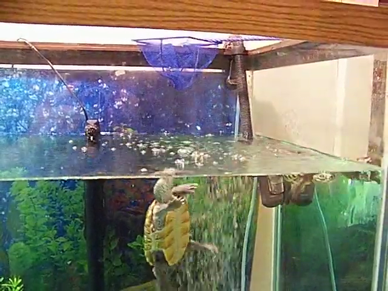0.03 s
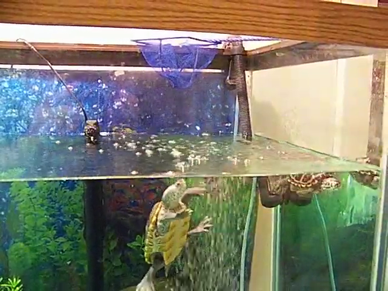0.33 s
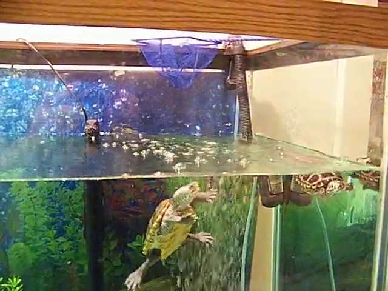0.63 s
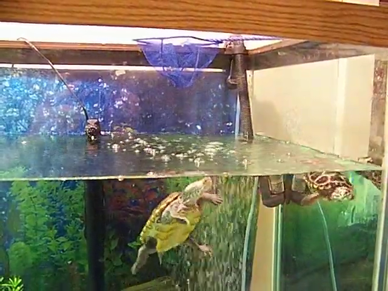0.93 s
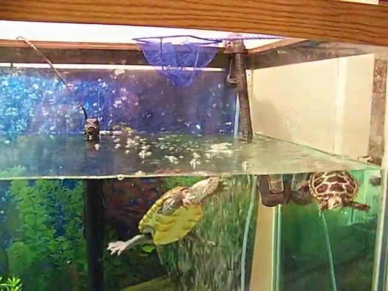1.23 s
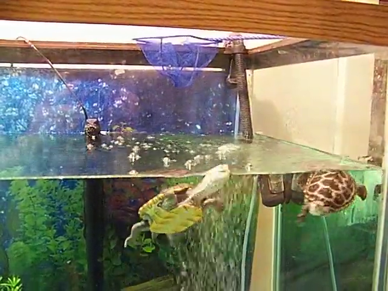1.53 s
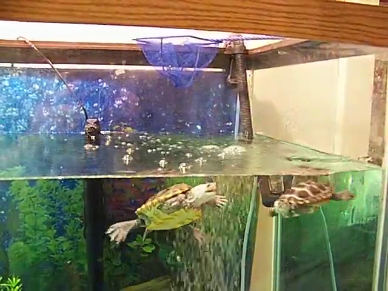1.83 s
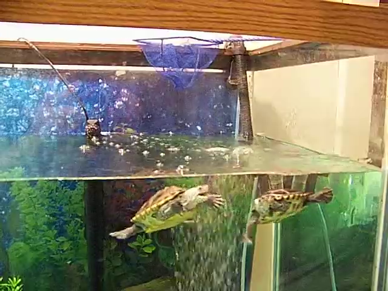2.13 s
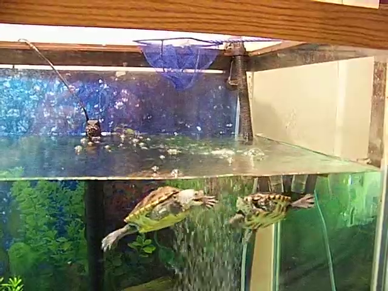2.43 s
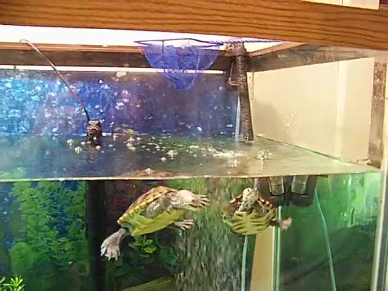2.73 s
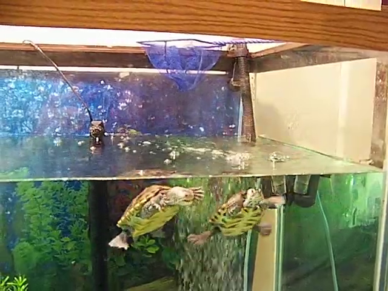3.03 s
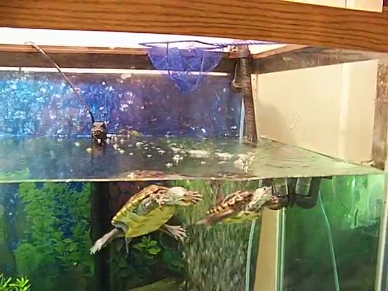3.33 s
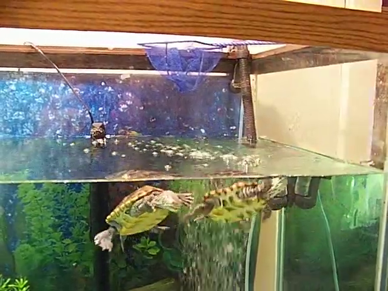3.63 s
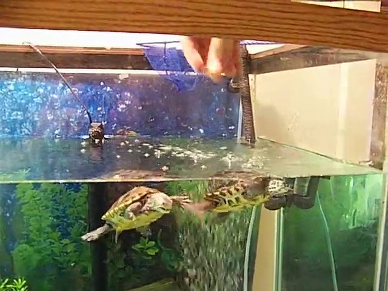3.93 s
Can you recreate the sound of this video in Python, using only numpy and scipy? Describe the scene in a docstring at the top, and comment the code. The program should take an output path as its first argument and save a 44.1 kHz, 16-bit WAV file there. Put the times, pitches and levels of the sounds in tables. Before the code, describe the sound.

Light water splashes and patters as turtles swim, with an aquarium filter trickling and humming underneath.

```python
"""A glass tank, up close: turtles paddle after floating food pellets.
Their feet throw fizzing splashes, droplets tick and smack on the surface, a few bubbles plop and water
laps over the shells; the glass and the room throw it all back. Underneath, the filter hisses, trickles
and bubbles, and two pump motors hum and beat against each other."""
import sys
import numpy as np
from scipy import signal
from scipy.fft import rfft, irfft, next_fast_len
from scipy.io import wavfile

SR = 44100
rng = np.random.default_rng(int(sys.argv[2]) if len(sys.argv) > 2 else 0)


def wav_out(sig):
    """Save sig, one row per channel (or a flat mono array), as 16-bit PCM at SR to the path in sys.argv[1]."""
    wavfile.write(sys.argv[1], SR, np.round(np.clip(np.atleast_2d(sig).T, -1, 1) * 32767).astype(np.int16))


N = 176400
T = np.arange(N) / SR

# level ride of the filter's water flow: time_s, level_db
FLOW_RIDE = [(0, -54), (.85, -53), (1.1, -50.5), (2.6, -50.5), (4, -50.5)]


def amp(db):
    """Decibels to gain."""
    return 10 ** (np.asarray(db) / 20)


def unit(x):
    """Scales to rms 1."""
    return x / np.sqrt(np.mean(x ** 2) + 1e-20)


def add(mix, start_s, sound):
    """Mixes a sound in at its start time."""
    part = mix[max(round(start_s * SR), 0):][:len(sound)]
    part += sound[:len(part)]


def fader(ride):
    """Gain over the whole scene from (time_s, level_db) points."""
    return amp(np.interp(T, *np.transpose(ride)))


def colour(x, eq):
    """Applies an EQ curve drawn on a log-frequency axis."""
    size = next_fast_len(2 * len(x))
    hz, db = np.transpose(eq)
    gain = amp(np.interp(np.log(np.fft.rfftfreq(size, 1 / SR) + 1), np.log(hz), db))
    return irfft(rfft(x, size) * gain, size)[:len(x)]


def pops(per_s, spread_db):
    """A random train of tiny bursts, a few much larger than the rest."""
    clicks = (rng.random(N) < per_s / SR) * rng.choice([-1., 1.], N)
    return clicks * amp(spread_db * np.minimum(rng.exponential(1, N), 4))


def filter_flow():
    """The filter's trickling wash, its fizzing air bubbles and the resonances that they stir."""
    # tone of the wash: freq_hz, gain_db
    wash_eq = [(15, 7.5), (30, 4), (70, 1.5), (140, -7), (290, -5), (450, -9.5), (700, -5), (830, -8),
               (1000, -4.5), (1280, -7), (1600, -10), (2200, -9.5), (2900, -11.5), (3300, -18.5),
               (4050, -35.5), (9000, -64)]
    # tone of the air bubbles: freq_hz, gain_db
    fizz_eq = [(1000, -29.5), (4250, -27), (5100, -12.5), (6300, -5), (7400, -0.5), (8000, -3),
               (8600, -18.5), (9200, -48.5)]
    # level ride of the fizz: time_s, level_db
    fizz_ride = [(0, -55), (.85, -56), (1.1, -54), (2.6, -54), (4, -53.5)]
    # tank and hood resonances: pitch_hz, width_hz, level_db
    resonances = [(101.6, 2.4, -62), (230.5, 6.9, -62.5), (308, 11, -69), (374.4, 11, -71.5),
                  (687.5, 14, -71), (978, 13, -66.5), (1138, 10, -71), (1260, 12, -72)]
    trickle = unit(pops(per_s=1200, spread_db=5))
    wash = unit(colour(0.5 * trickle + rng.standard_normal(N), wash_eq))
    fizz = unit(colour(pops(per_s=9000, spread_db=3.5), fizz_eq))
    out = wash * fader(FLOW_RIDE) + fizz * fader(fizz_ride)
    freq_hz = np.fft.rfftfreq(N, 1 / SR)
    for pitch_hz, width_hz, level_db in resonances:
        peak = 1 / (1 + ((freq_hz - pitch_hz) / width_hz) ** 2)
        out += amp(level_db) * unit(irfft(rfft(rng.standard_normal(N)) * peak, N))
    return out


def outlet_bubbles():
    """Small bubbles ring at random where the filter returns its water, riding with the flow."""
    # bubble sizes: pitch_hz, average_db
    sizes = [(900, -64), (1050, -62), (1250, -63.5), (1550, -66.5), (2000, -67), (2400, -68.5), (2850, -66)]
    out, t = np.zeros(N), T[:SR // 16]
    attack_s, decay_s, pitch_spread = 0.002, 0.012, 0.0827
    envelope = np.minimum(t / attack_s, 1) * np.exp(-t / decay_s)
    for pitch_hz, average_db in sizes:
        group = np.zeros(N)
        for detune in pitch_spread * rng.uniform(-0.994, 1, size=4):
            ring = envelope * np.sin(2 * np.pi * pitch_hz * (1 + detune) * t)
            group += signal.oaconvolve(pops(per_s=12, spread_db=1.5), ring)[:N]
        out += amp(average_db) * unit(group)
    return out * unit(fader(FLOW_RIDE))


def ticking():
    """Very faint ticks in the hiss, uneven in time and strength."""
    # tone of a tick: freq_hz, gain_db
    tick_eq = [(300, -3.5), (3000, 4.5), (5500, -5), (9000, -20)]
    gap_s, jitter_s, click_db, spread_db = 0.016, 0.0012, -39, 4
    clicks = np.zeros(N)
    for k, (late, strength) in enumerate(rng.standard_normal(size=(280, 2))):
        add(clicks, k * gap_s + jitter_s * late, amp([click_db + spread_db * strength]))
    return colour(clicks, tick_eq)


def pumps():
    """Two motors, slightly apart in speed: their hum swells and sags once a second."""
    mains_hz, beat_hz, crest_s = 60, 1.0, 1.51
    t = T - crest_s
    first = amp(-44) * np.cos(2 * np.pi * mains_hz * t)
    second = amp(-48) * np.cos(2 * np.pi * (mains_hz + beat_hz) * t)
    return first + second


def splashes():
    """Each paddle stroke throws a quick shower of fine spray and a cluster of larger, ringing bubbles."""
    # strokes of the feet: start_s, length_s, spray_db, bubbles_vs_spray_db, bubble_pitch_hz
    strokes = [(0, .022, -31.5, -5, 2240), (0.048, 0.018, -35.5, -9.5, 2180),
               (0.071, 0.018, -41.5, -20, 2400), (0.106, 0.046, -37, -14, 2220),
               (0.155, 0.068, -48.5, -7.5, 2200), (.99, 0.19, -55.5, -8.5, 2530),
               (1.222, 0.032, -46, -5, 2820), (1.299, .01, -43.5, -17, 2600),
               (1.542, 0.044, -43.5, -6, 2400), (1.658, 0.015, -39, -10.5, 2450),
               (1.69, 0.059, -46, -8.5, 2510), (1.743, 0.061, -39.5, -9.5, 2410),
               (1.824, 0.062, -39.5, -9, 2380), (1.899, 0.019, -36, -11, 2460),
               (1.962, 0.0064, -38, -8.5, 2480), (1.987, 0.038, -49, -7, 2370),
               (2.118, 0.045, -46.5, -10.5, 2400), (2.183, 0.035, -47.5, -7.5, 2340),
               (2.361, 0.091, -53.5, -7, 2420), (2.515, 0.0059, -40.5, -21, 2380),
               (2.537, .004, -39.5, -10, 2720), (2.774, 0.011, -39.5, -14, 2460),
               (3.639, 0.0085, -51, 3, 2870)]
    # tone of the fine spray: freq_hz, gain_db
    spray_eq = [(300, -40), (1800, -35), (3300, -25.5), (4200, -27), (5200, -10.5), (6300, -3), (7200, 2),
                (8000, -3), (8600, -18.5), (9200, -36)]
    # tone of the churned water: freq_hz, gain_db
    gurgle_eq = [(300, -4.5), (1700, -13.5), (2300, -1.5), (2850, -0.5), (3400, -0.5), (4100, -20),
                 (6000, -14.5)]
    attack_s, release_s, ring_width_hz, ring_db = 0.0015, 0.011, 210, -2.5
    out, t = np.zeros(N), T[:SR // 3]
    spray = unit(colour(pops(per_s=2200, spread_db=3), spray_eq))
    churn = pops(per_s=2000, spread_db=2.5)
    gurgle = unit(colour(churn, gurgle_eq))
    for start_s, length_s, spray_db, bubbles_vs_spray_db, pitch_hz in strokes:
        span = (round(start_s * SR) + np.arange(len(t))) % N
        envelope = np.minimum(t / attack_s, 1) * np.exp(-np.maximum(t - length_s, 0) / release_s)
        resonator = signal.iirpeak(pitch_hz, pitch_hz / ring_width_hz, SR)
        ring = unit(signal.lfilter(*resonator, churn[span]))
        bubbles = amp(bubbles_vs_spray_db) * unit(gurgle[span] + amp(ring_db) * ring)
        add(out, start_s, amp(spray_db) * envelope * (spray[span] + bubbles))
    return out


def plops():
    """Larger bubbles ring briefly, rising in pitch."""
    # single bubbles: start_s, pitch_hz, level_db, decay_s
    bubbles = [(.007, 2140, -46.5, 0.021), (2.6726, 2390, -29, 0.0022), (3.641, 3040, -44, 0.0027),
               (3.809, 2180, -36.5, 0.0048)]
    attack_s, rise_per_s = 0.00022, 15  # the rise is in multiples of the starting pitch
    out, t = np.zeros(N), T[:SR // 20]
    for start_s, pitch_hz, level_db, decay_s in bubbles:
        ring = np.sin(2 * np.pi * pitch_hz * (t + 0.5 * rise_per_s * t ** 2))
        envelope = np.minimum(t / attack_s, 1) * np.exp(-t / decay_s)
        add(out, start_s, amp(level_db) * envelope * ring)
    return out


def droplets():
    """Each droplet is a few cycles of a tiny bubble with a faint snap, echoed by the glass wall."""
    # droplets landing: time_s, level_db, pitch_hz, echo_gain (0-1)
    landings = [(0.0186, -18, 7200, .2), (0.019, -36, 7200, .3), (.0237, -37, 7000, .1),
                (0.0338, -15.5, 7330, .1), (.0586, -20.5, 7530, .7), (.1, -25, 7400, .1),
                (.1076, -17.5, 7170, .1), (.1087, -18.5, 7200, .1), (0.1342, -20, 7360, .1),
                (.1411, -14, 7200, .1), (0.145, -15, 7160, .1), (.1462, -19, 7230, .1),
                (.1491, -19, 7200, .1), (.1728, -23, 7200, .1), (.193, -25, 6940, .1),
                (0.2078, -26, 7060, .1), (0.2178, -31, 7000, .2), (0.254, -29, 6770, .3),
                (0.6527, -15, 7140, .05), (.705, -32, 7400, .4), (0.7477, -28.5, 7350, .3),
                (.9198, -29.5, 7360, .3), (0.928, -30.5, 7360, .2), (1.0566, -24.5, 7400, .15),
                (1.0906, -30, 7360, .2), (1.2262, -21.5, 7400, .4), (1.2367, -30, 6000, .2),
                (1.2965, -25.5, 7330, .2), (1.547, -21, 7040, .4), (1.561, -31.5, 7000, .3),
                (1.5793, -32, 6900, .2), (1.7135, -30, 6900, .4), (1.8311, -22.5, 7400, .2),
                (1.8601, -16, 6550, .55), (1.9046, -26, 6850, .6), (1.915, -24, 6900, .8),
                (2.1942, -31, 6760, .1), (2.2003, -27.5, 7250, .6), (2.2083, -26.5, 7220, .6),
                (2.351, -29.5, 7400, .1), (2.5332, -17.5, 6760, .9), (2.5591, -24, 6700, .85),
                (2.574, -29, 6700, .9), (2.6735, -27, 6800, 0.1), (2.6918, -32, 6550, .9),
                (2.7073, -32.5, 6840, .2), (2.7707, -18, 6870, .95), (2.7913, -30.5, 6600, .8),
                (3.643, -30, 6500, .3)]
    # tone of the snap: freq_hz, gain_db
    snap_eq = [(100, -20.5), (1500, -11.5), (2800, -3.5), (4150, -15), (5200, 2), (7000, -1), (8200, 4.5),
               (9200, -21)]
    width_s, echo_delay_s = 0.00025, 0.00182
    out, t = np.zeros(N), np.arange(-SR // 200, SR // 200) / SR  # centred on the landing
    snap = colour(1. * (t == 0), snap_eq)
    envelope = np.exp(-0.5 * (t / width_s) ** 2)
    for time_s, level_db, pitch_hz, echo_gain in landings:
        tick = amp(level_db) * (envelope * np.sin(2 * np.pi * pitch_hz * t) + snap)
        add(out, time_s + t[0], tick)
        add(out, time_s + t[0] + echo_delay_s, echo_gain * tick)
    return out


def smacks():
    """A sharp crack and a short hollow burst as the surface is broken."""
    # wet smacks: start_s, crack_db, body_db
    hits = [(0.6541, -18, -46.5), (0.928, -26.5, -58), (1.0562, -15.5, -48), (1.2373, -19.5, -42),
            (1.2962, -14.5, -47), (2.5335, -23, -42.5), (2.6717, -8, -31), (2.7707, -21, -43)]
    # tone of the crack: freq_hz, gain_db
    crack_eq = [(100, -10), (600, -8), (2600, -1.5), (4100, -5), (5200, 3), (7500, -4), (8300, -10),
                (9000, -42)]
    # tone of the hollow body: freq_hz, gain_db
    body_eq = [(100, -24), (500, -4), (1200, -4), (1900, 2), (2600, -3.5), (3200, -5), (3900, -22),
               (7000, -25), (9200, -62.5)]
    body_decay_s = 0.0023
    cracks, bodies, t = np.zeros(N), np.zeros(N), T[:SR // 40]
    for start_s, crack_db, body_db in hits:
        add(cracks, start_s, amp([crack_db]))
        hollow = unit(colour(rng.standard_normal(len(t)), body_eq))
        add(bodies, start_s, amp(body_db) * np.exp(-t / body_decay_s) * hollow)
    return colour(cracks, crack_eq) + bodies


def laps():
    """Water laps over the shells in soft trickles, darker than the spray."""
    # small waves: start_s, length_s, level_db
    waves = [(1.037, 0.17, -53.5), (1.222, 0.12, -55), (1.536, 0.084, -51.5), (2.359, 0.11, -53.5),
             (2.67, 0.052, -48), (3.638, 0.021, -47)]
    # tone of the lapping: freq_hz, gain_db
    lap_eq = [(500, -27), (1900, -6), (2600, -1), (3300, -7.5), (4100, -24), (5200, -4), (6100, 3.5),
              (7000, -5), (9000, -26)]
    fade_s = 0.014
    envelope = np.zeros(N)
    for start_s, length_s, level_db in waves:
        fade_in = np.clip((T - start_s) / fade_s, 0, 1)
        fade_out = np.clip((start_s + length_s - T) / fade_s, 0, 1)
        envelope += amp(level_db) * fade_in * fade_out
    return envelope * unit(colour(pops(per_s=1200, spread_db=5), lap_eq))


def room(x):
    """A short tail of scattered reflections from the tank, its hood and the walls."""
    wet_db, t60_s, predelay_s, echoes_per_s = -18.5, 0.29, 0.009, 3000
    t = T[:SR // 2]
    echoes = rng.standard_normal(len(t)) * (rng.random(len(t)) < echoes_per_s / SR)
    tail = echoes * (t > predelay_s) * amp(-60 * t / t60_s)
    return amp(wet_db) * signal.fftconvolve(x, tail / np.linalg.norm(tail))[:N]


def scene():
    """The turtles' water sounds and their reflections over a bed of filter and pumps, in mono."""
    water = droplets() + splashes() + laps() + plops() + smacks()
    return (water + room(water) + filter_flow() + outlet_bubbles() + ticking() + pumps())[None]


def record(dry):
    """A steep high cut takes the air off the mix."""
    cutoff_hz = 8950
    high_cut = signal.firwin(401, cutoff_hz, window=("kaiser", 8), fs=SR)
    return signal.oaconvolve(dry, high_cut[None], "same")


dry = scene()
out = record(dry)
wav_out(out)
```